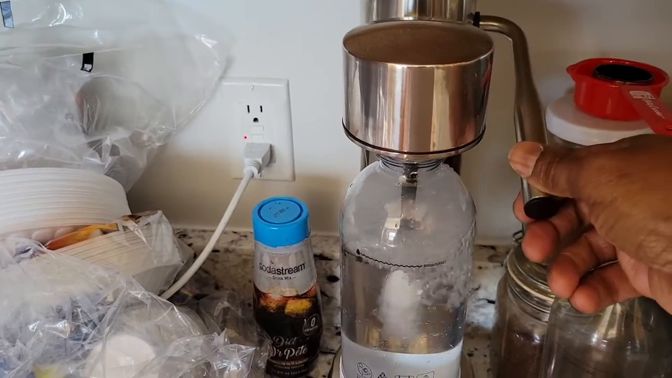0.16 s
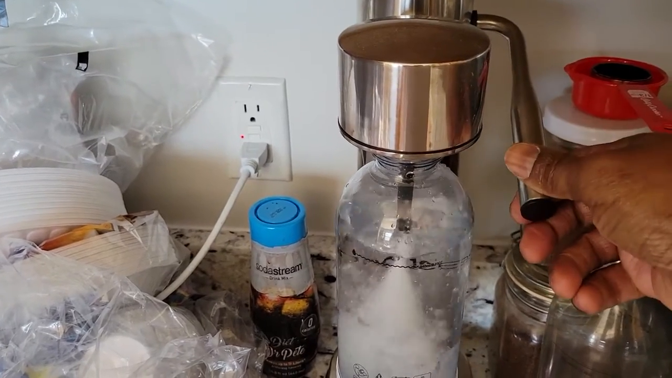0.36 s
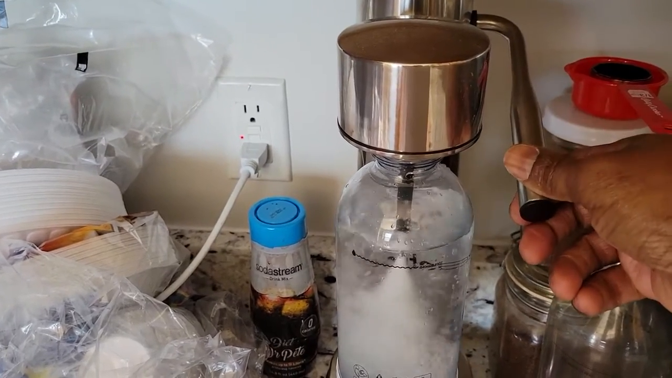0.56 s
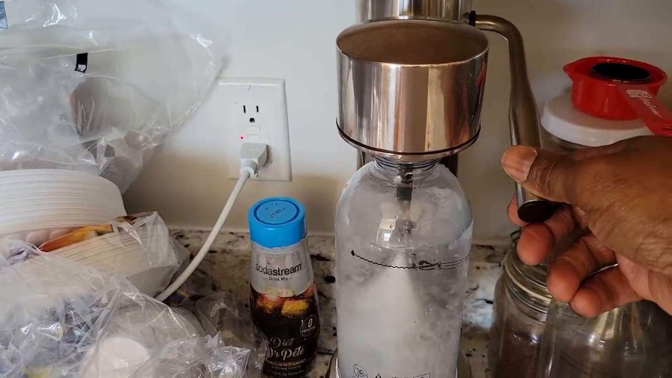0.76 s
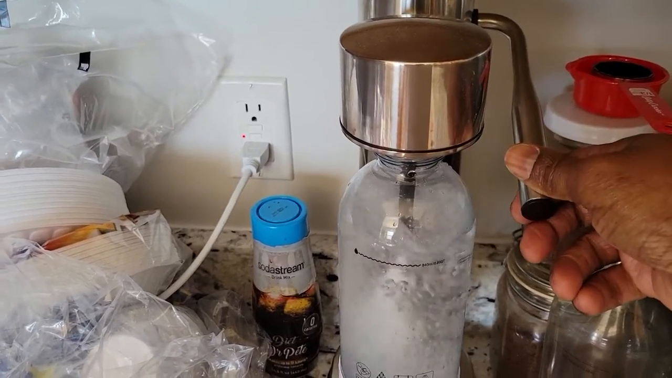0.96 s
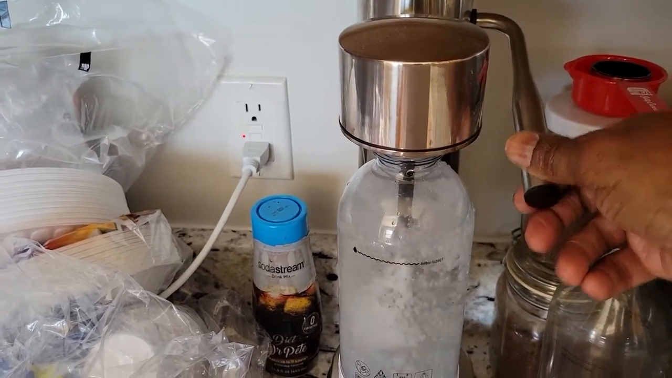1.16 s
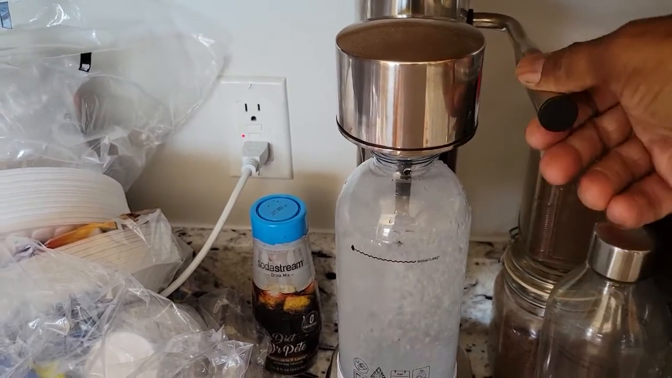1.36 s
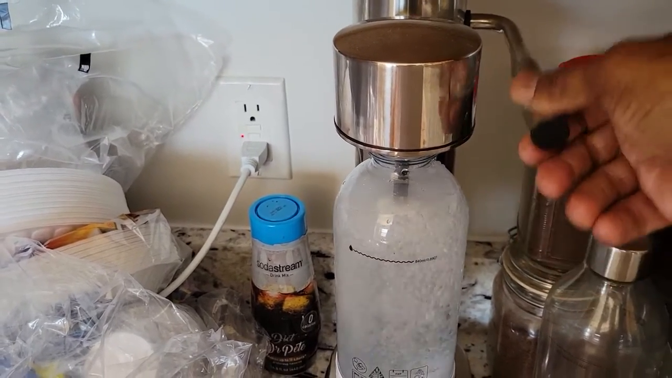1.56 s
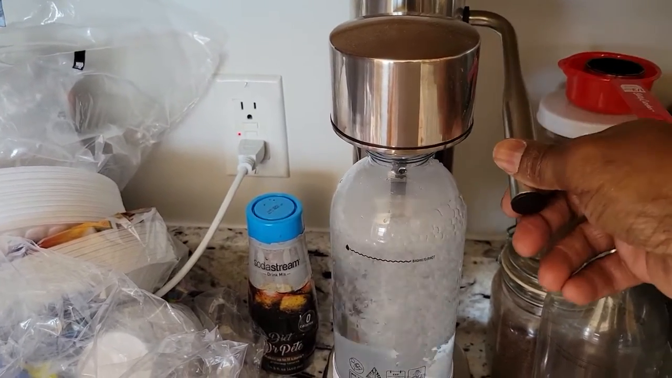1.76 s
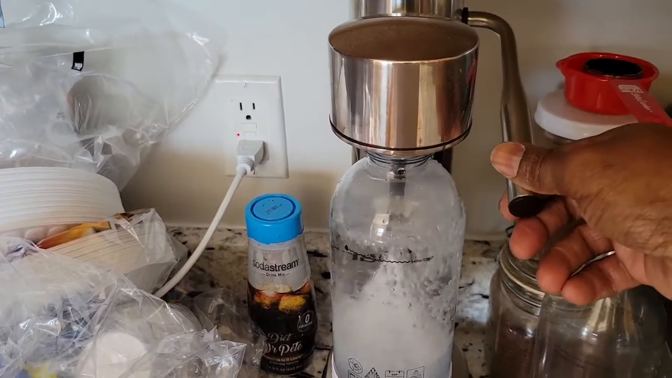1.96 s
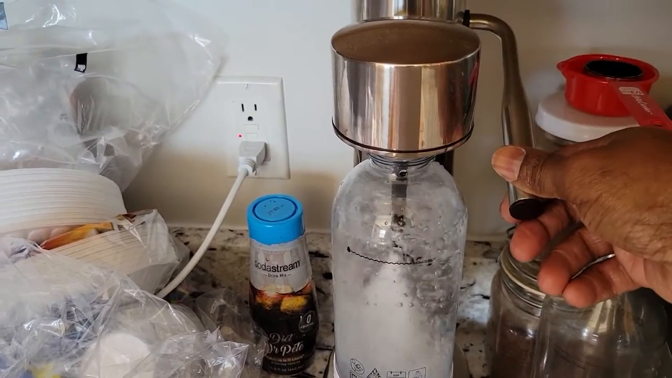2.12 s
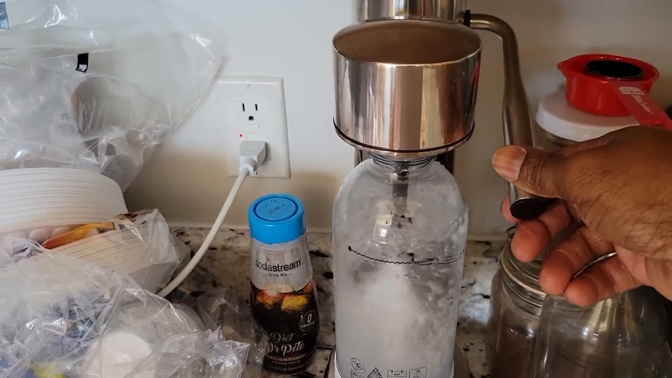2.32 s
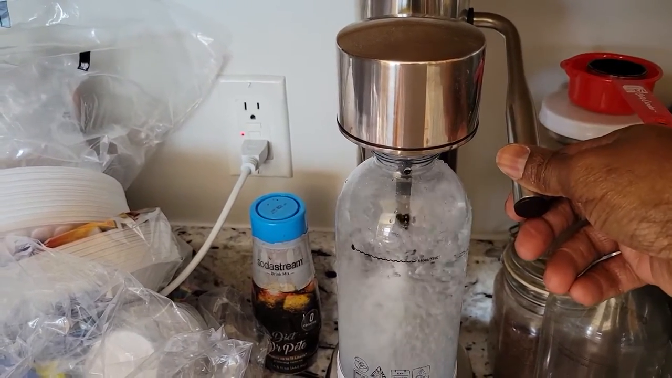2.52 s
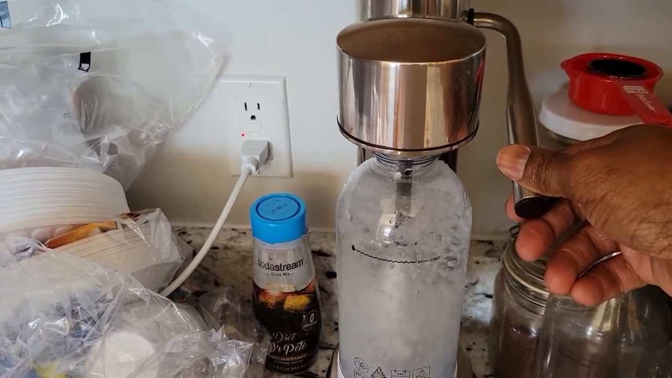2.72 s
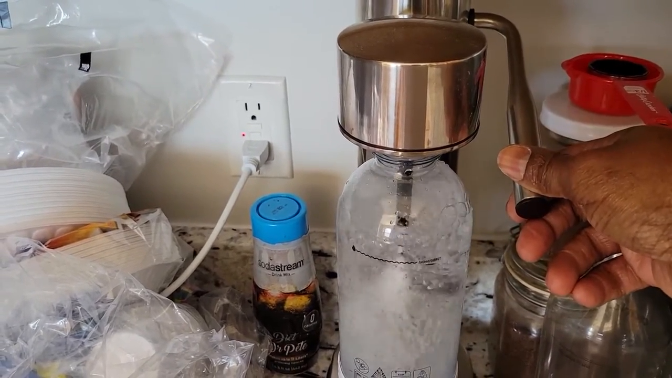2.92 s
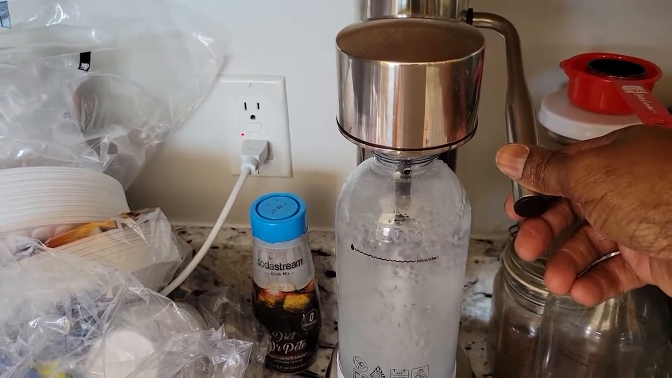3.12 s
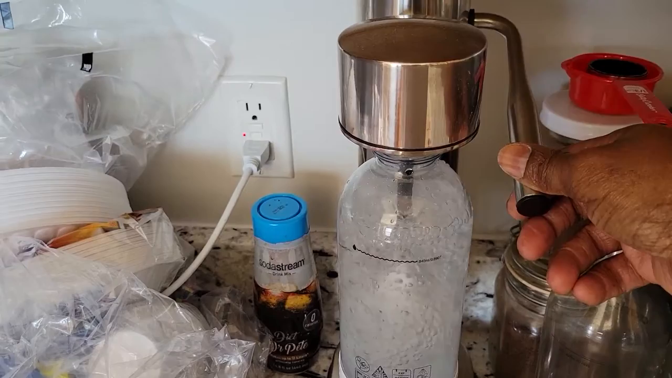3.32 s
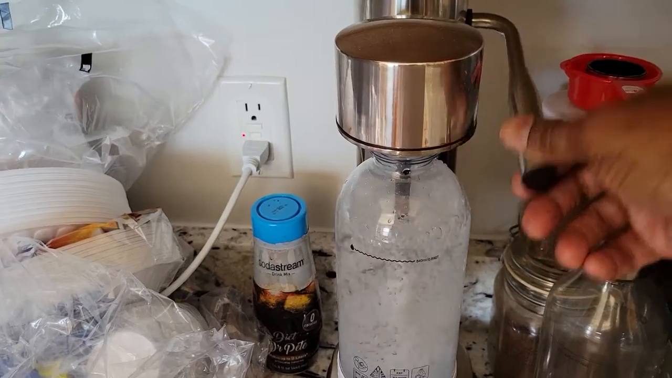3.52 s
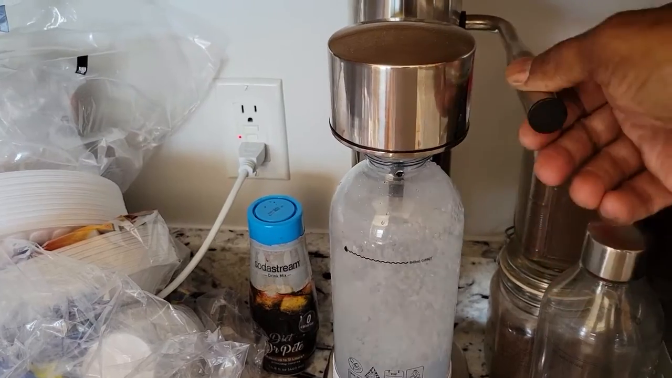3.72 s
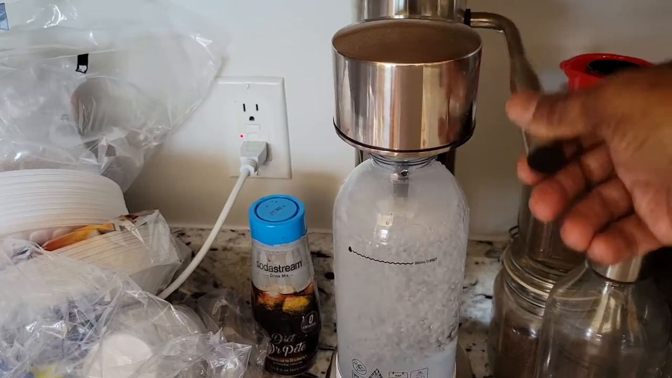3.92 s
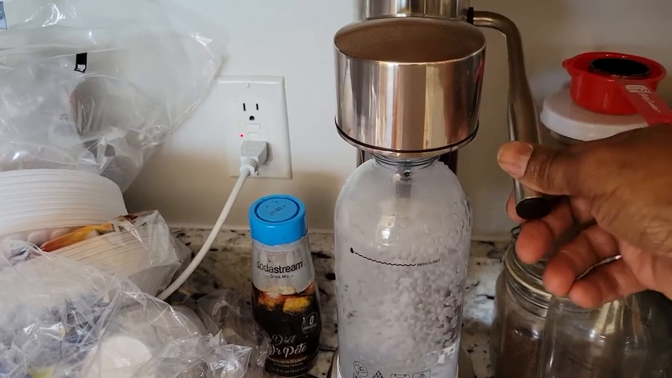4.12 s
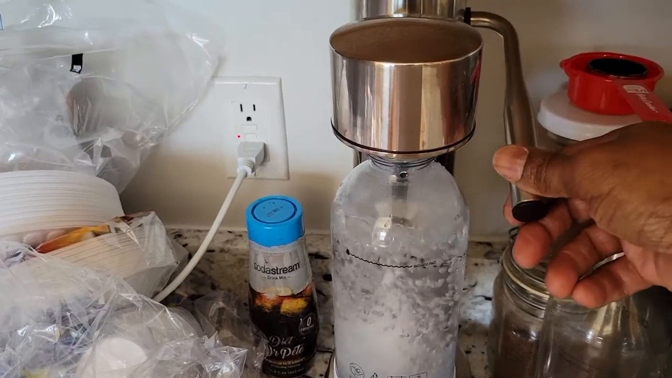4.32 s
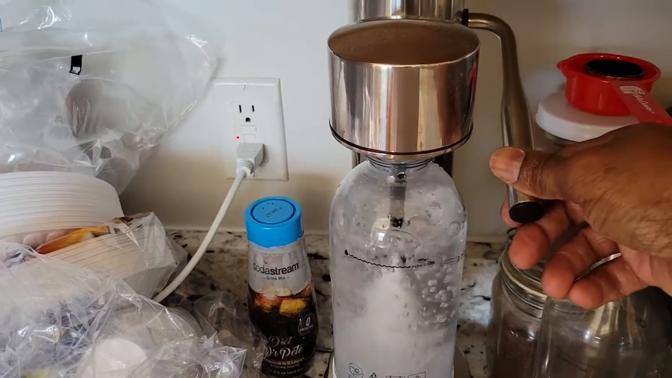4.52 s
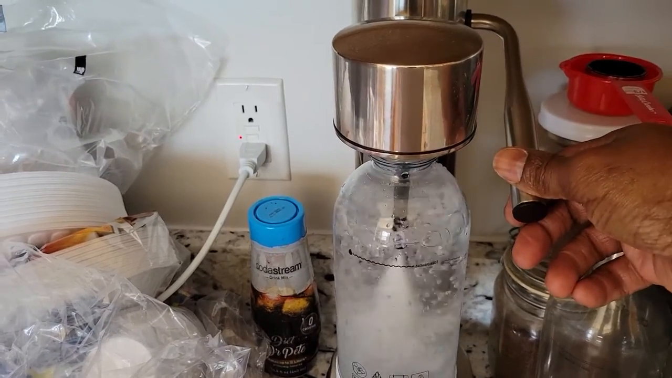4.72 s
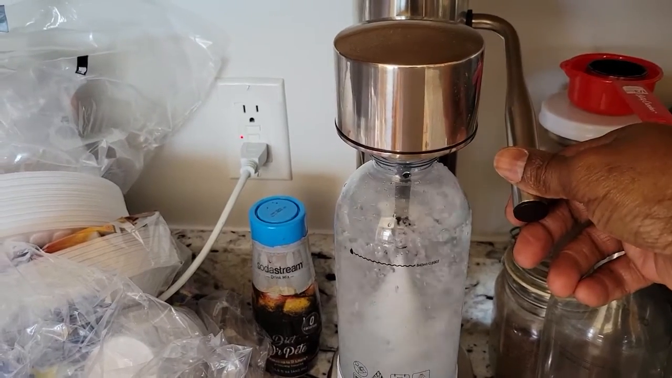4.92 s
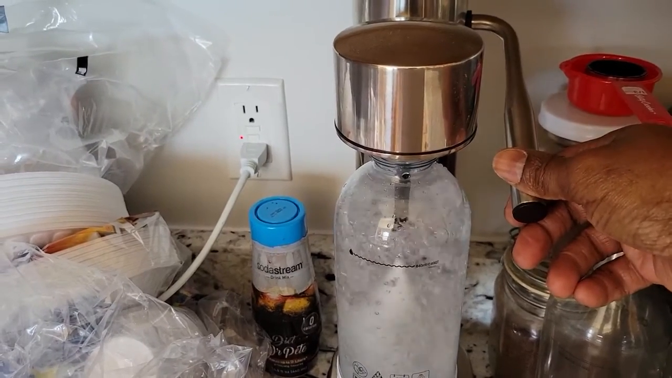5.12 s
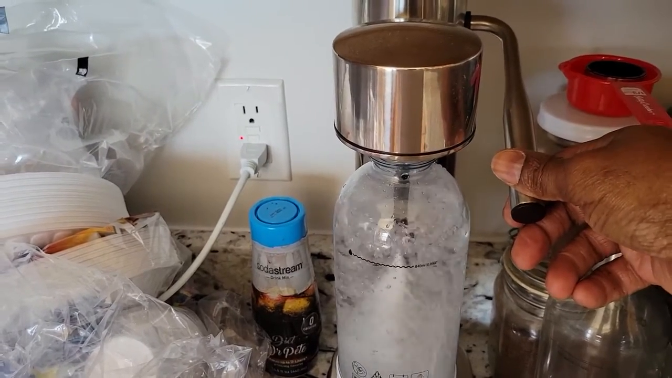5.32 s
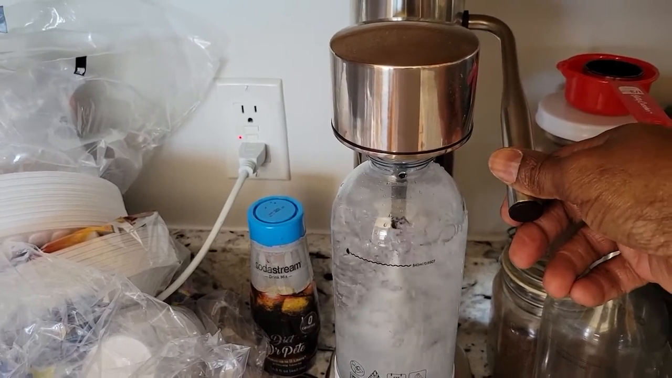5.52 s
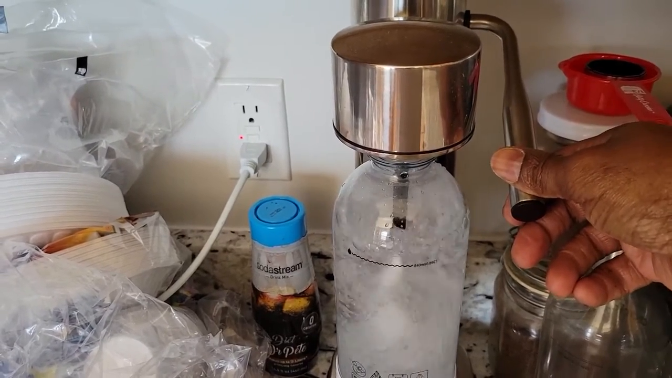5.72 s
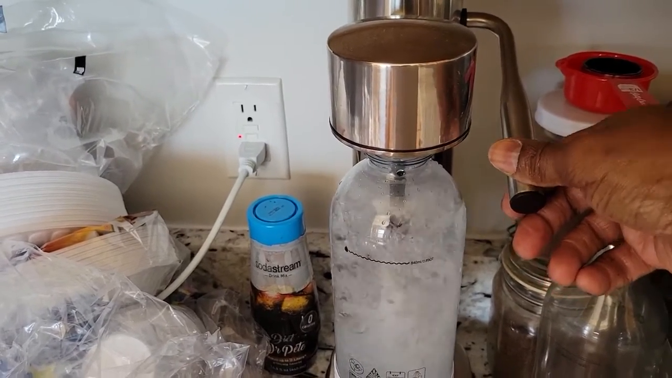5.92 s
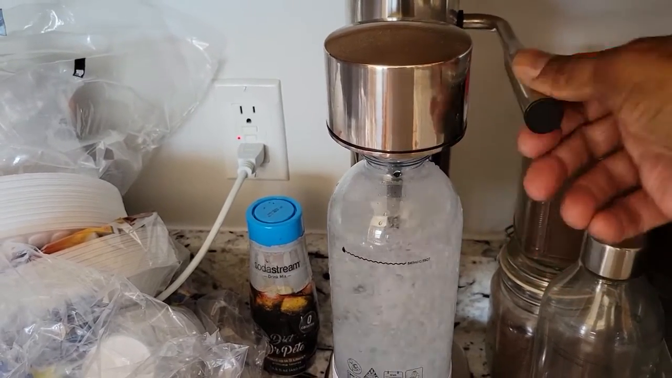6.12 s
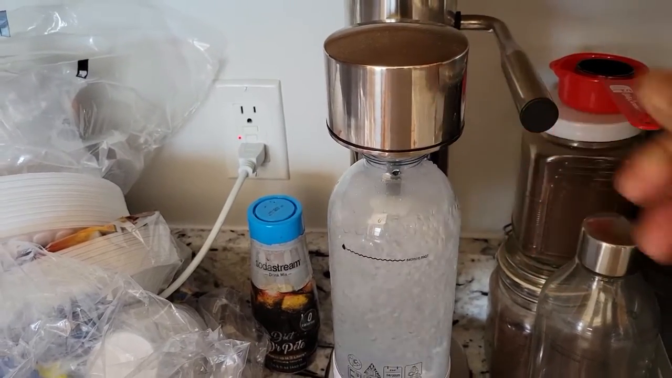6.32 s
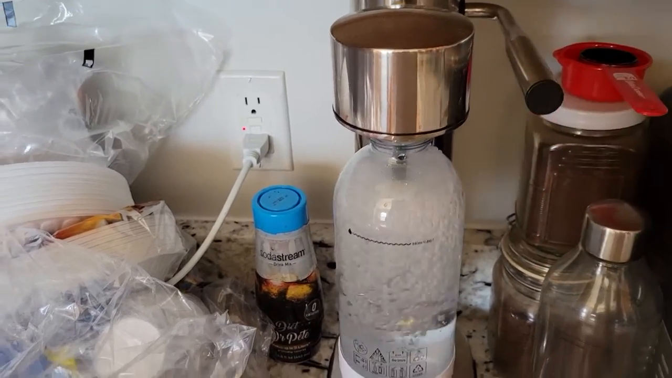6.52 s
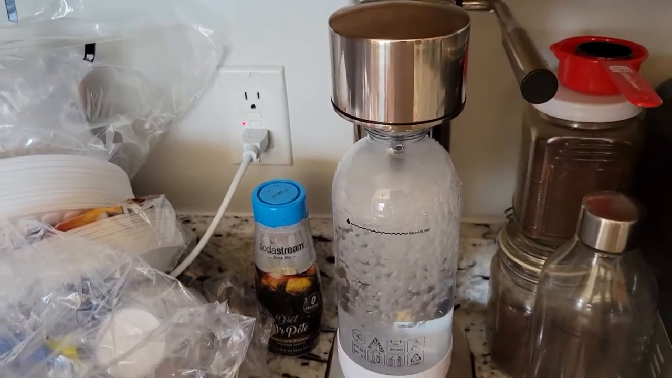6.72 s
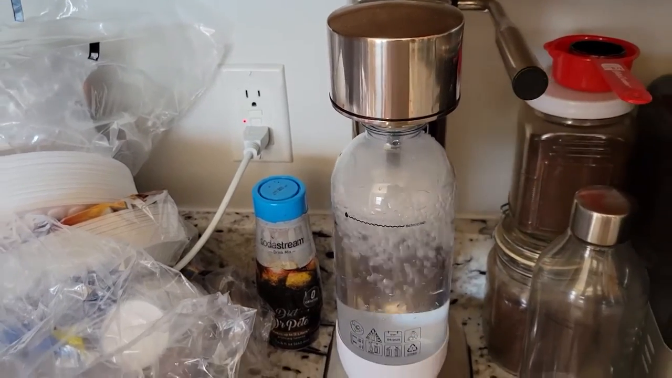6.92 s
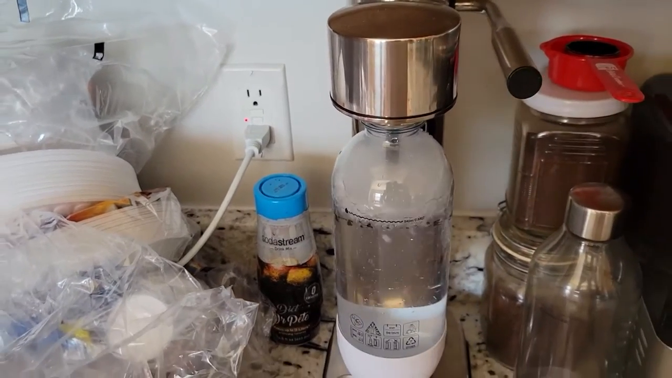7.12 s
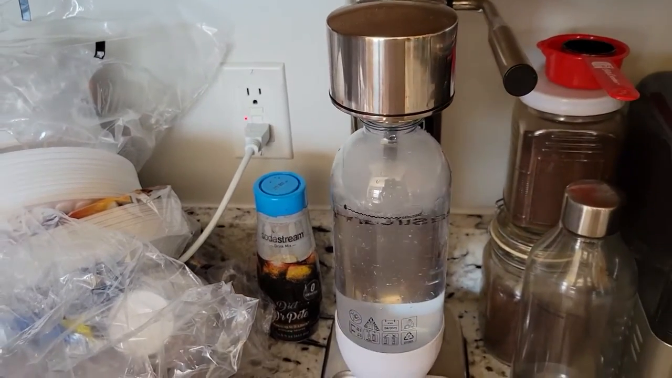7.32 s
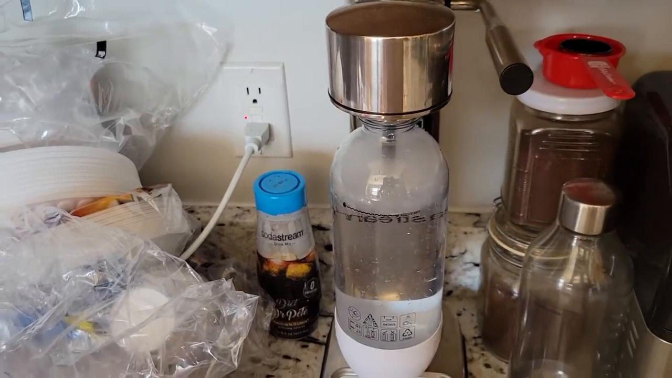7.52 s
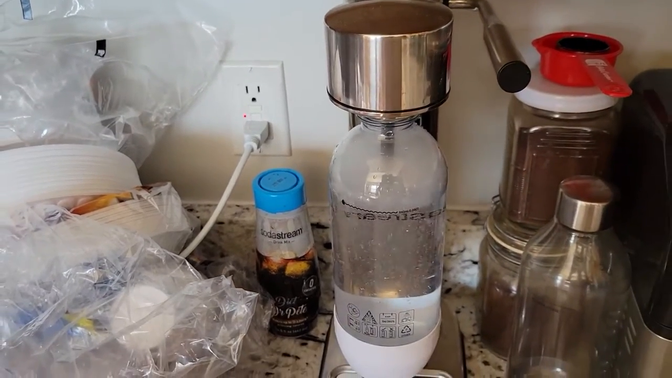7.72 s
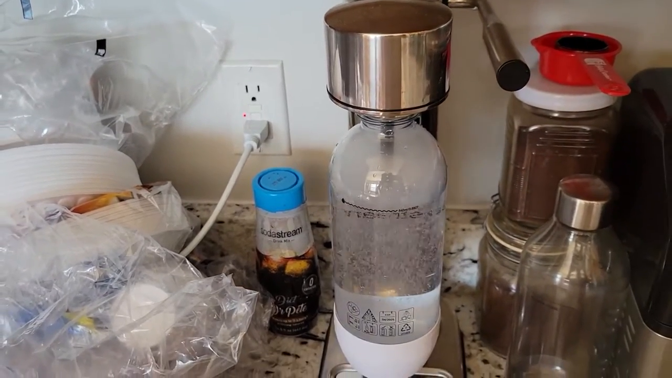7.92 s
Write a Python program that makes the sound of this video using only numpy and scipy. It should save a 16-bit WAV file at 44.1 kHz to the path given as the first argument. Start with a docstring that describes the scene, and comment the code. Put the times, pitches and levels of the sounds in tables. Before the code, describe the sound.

A countertop carbonating machine heard from very near, in stereo: soft lever knocks, then a fizzing, bubbling rush in the bottle, cut off by a sudden spurt of escaping gas. The rush returns twice, growing finer and fizzier as pressure builds. After a hard click-clack, the last release hisses brightly, weakens with a thin whistle and fades, leaving quiet low kitchen rumble and a few light knocks along the way.

```python
"""A cloud of carbon dioxide bubbles roars in a bottle of water while a lever is held, three times.
The roar is banded noise from random bubble births plus gliding tones, rung through the bottle; the gas space hums.
On release the valve vents a bright hiss: smooth noise coloured by a pipe, whistling as the flow weakens.
Lever and valve knock now and then: short rattles ringing the machine head.
Behind it lies a low kitchen rumble of banded noise with wavering hum tones."""
import sys
import numpy as np
from scipy import signal
from scipy.io import wavfile
from scipy.ndimage import uniform_filter1d

SR = 44100
rng = np.random.default_rng(int(sys.argv[2]) if len(sys.argv) > 2 else 0)


def dump_mix(stems):
    """Bounce the given channels to the path in sys.argv[1] as a 16-bit WAV at rate SR."""
    frames = np.atleast_2d(stems).T  # one column per channel
    limited = np.clip(frames, -1, 1)  # hard clip at full scale
    pcm = np.round(limited * 32767).astype(np.int16)
    wavfile.write(sys.argv[1], SR, pcm)


N = 350991

# gas jet, stretch by stretch: (time [s], relative roar level [dB], low, middle, high ring level re roar [dB])
JET_STRETCHES = [
    [(0.13, -39, -14, -14, -10), (0.142, -42, -12, 1, -10), (0.148, -39, -29, 3, -8),
     (0.186, -25.5, -16, -1.5, -20), (0.248, -31.5, -7, -6, -12), (0.258, -29.5, -12, -3.5, -27),
     (0.35, -33, -11, -4, -6), (0.356, -30, -18, -2.5, -29), (0.428, -31, -11, -2, -11),
     (0.478, -23.5, -3.5, -5, -19), (0.56, -28.5, -14, -5, -18), (0.674, -24, -3, -0.5, -14),
     (0.706, -22.5, -7, -2, -11), (0.834, -26.5, -11, -5.5, -16.5), (1.036, -23.5, -5.5, -5.5, -8),
     (1.26, -32, -12, -4, -10.5)],
    [(1.715, -47, -2, 6, -6), (1.729, -27, -5, -8, -16), (1.757, -24, -11, -1, -10),
     (1.801, -21.5, -2, -5, -12), (1.883, -19.5, -6.5, -18, -19), (1.919, -25, -9, 0, -11),
     (1.945, -27, -14, -1.5, -14), (1.999, -23, -7, -9, -14), (2.069, -26, -8, -6, -13),
     (2.097, -28, -9, -1.5, -10), (2.119, -22.5, -11, 0, -12), (2.187, -22, -11, -9, -9.5),
     (2.355, -23, -15, -5, -11), (2.407, -23, -7, -16, -8.5), (2.439, -25, -10, -13, -9.5),
     (2.64, -22, -4, -2, -7.5)],
    [(2.66, -21.5, -7, -14, -12), (2.69, -25, -10, -17, -5), (2.71, -21.5, -5.5, -4, -8),
     (2.8, -24.5, -2.5, -16, -5.5), (2.852, -22, -18, 0.5, -10), (2.86, -22, -14, -6, -9),
     (2.948, -21, -1.5, -7.5, -7.5), (3.04, -24.5, -11.5, -3, -5), (3.09, -26, -12, -18, -7),
     (3.13, -28, -6, -17, -6.5), (3.142, -27, -9, -2, -10), (3.216, -24.5, -12.5, -4, -5),
     (3.382, -22, -3, -11, -4), (3.418, -24.5, -4.5, -7, -5.5), (3.56, -32.5, -8, 0, -7)],
    [(4.045, -46, 0, 2, -8), (4.065, -26, -19, -7, -10), (4.083, -28.5, -10, -11, -4),
     (4.141, -24.5, -6, -17, -1.5), (4.245, -22, -2.5, -5.5, -4.5), (4.431, -27.5, -15, -4, -12),
     (4.513, -25, -26, -9, -4), (4.551, -26.5, -8, -8, -9), (4.603, -22, -30, -7, -10),
     (4.615, -29, -8, -7, -5.5), (4.655, -25.5, -2, 1, -5), (4.667, -17, -11, -16, -6.5),
     (4.681, -26, -4, -7, -5), (4.743, -25.5, -12, -5, -9), (4.8, -27.5, -8, -10, -7)],
    [(4.82, -25, -18, -9, -12), (4.882, -28, -16, -9, -13.5), (4.928, -24.5, -13, -5, -4),
     (4.978, -25.5, -4, -7, -13), (4.986, -25, -7, -13, -6.5), (5.088, -23, -12, -5, -11),
     (5.162, -26.5, -8, -16, -4), (5.19, -20, -7, -6, -7), (5.206, -26, -5, 3, -7),
     (5.226, -25, -23, -2, -4), (5.326, -27, -12, -11, -11), (5.384, -24, -17, -13, -9.5),
     (5.534, -24.5, -10, -5, -10), (5.59, -28, -13, -6, -8)],
    [(5.65, -23, -15, -20, -13), (5.662, -32, -8, -10, -13), (5.68, -29.5, -18, -18, -11),
     (5.698, -30, -7, -19, -15), (5.758, -29, -13, -18, -6), (5.784, -36, -2, -12, -13),
     (5.802, -27, -4, -14, -1), (5.822, -30.5, -7, 6, -4), (5.874, -30, -16, -5, -3),
     (5.884, -23.5, -8, -8, -10), (5.948, -40.5, -15, 2, -5), (5.96, -34, -2, 3, -4),
     (5.972, -32, -4, -2, -7), (5.994, -50, 15, 6, -15), (6.022, -45, 3, 4, -9), (6.03, -40, 15, 15, -6)],
]
# pulls, at start and end: (time [s], bottle pressure [0-1], gas space hum level [dB])
FILLS = [
    [(0.13, 0, -43), (1.28, 0.37, -52)],
    [(1.715, 0, -50), (3.59, 0.78, -51)],
    [(4.045, 0.22, -56), (5.75, 0.88, -48), (6.04, 0.83, -73)],
]
# bubble roar spectrum: (frequency [Hz], relative density [dB per Hz])
ROAR_SPECTRUM = [(260, -73), (450, -34.5), (590, -25), (846, -12), (1540, -8.5), (1790, -9), (2110, -5),
                 (2690, -2.5), (4620, -11), (5610, -11.5), (8170, -20.5), (10900, -30.5), (12100, -25.5),
                 (15300, -39), (16300, -49)]
# roar stereo balance: (frequency [Hz], left minus right [dB])
ROAR_BALANCE = [(60, 0.0), (150, 2), (380, 2), (950, 2.5), (2380, 6.5), (5980, 2.0), (15000, -0.5)]
# machine stereo image, roar and hiss: (frequency [Hz], left-right likeness [0-1])
MACHINE_LIKENESS = [(350, .6), (1000, .2), (1800, .6), (3400, .58), (5000, .18), (7600, .3), (11000, .12)]
# bottle wall resonances: (frequency [Hz], width [Hz], gain [dB])
BOTTLE_MODES = [(1824, 75, 3), (2260, 20, 1), (2723, 230, -7), (3650, 390, -4), (5550, 1070, 1.5)]
# bottle rings that swell with the cloud: (frequency [Hz], width [Hz], swing [x ring level swing], wander [dB])
BOTTLE_RINGS = [(1860, 224, 1.3, 2), (2670, 160, 1.3, 0.5), (3630, 1960, 1.2, 3)]
RING_SWELLS_PER_S = 2.2
GAS_SPACE_HZ, GAS_SPACE_WIDTH_HZ = 373.8, 34
HUM_WAVER_DB, HUM_WAVERS_PER_S = 2, 14
HUM_FOLLOWS = 0.52   # share of the roar's dips that the hum shares
FIZZ_DB_PER_PRESSURE, DEPTH_DB_PER_PRESSURE = 15.5, -10.5   # smaller bubbles under pressure
FIZZ_STEADY, DEPTH_STEADY = 0.77, 1   # shares of the roar's surges that fizz and low end ignore
GLIDE_DB, GLIDE_DB_PER_PRESSURE = -8, -7   # at half pressure; long glides belong to the slack bottle
POP_DB, POP_DB_PER_PRESSURE = -21, 14   # at half pressure; bright pops come with pressure


def jet():
    """Bubbles torn off the nozzle in clumps ring through the bottle wall; the gas space above the water hums."""
    roar_db, *rings_db = in_time(JET_STRETCHES)[1:]
    gate, pressure, hum_db = in_time(FILLS)
    held = gate > .5
    pressure = pressure - .5   # the spectrum holds for half pressure
    surge_db = np.clip(roar_db - roar_db[held].mean(), -12, 12)
    fizz_db = FIZZ_DB_PER_PRESSURE * pressure - FIZZ_STEADY * surge_db
    depth_db = DEPTH_DB_PER_PRESSURE * pressure - DEPTH_STEADY * surge_db
    tilt_db = tilt(fizz_db, depth_db, pivot_hz=3330, reach=0.66)

    births = grains(7000 * amp(1.8 * drift(60)), spread_db=0.5)
    cloud = bands(births, ROAR_SPECTRUM, MACHINE_LIKENESS, ROAR_BALANCE, tilt_db,
                  patchy_db=2.03, patch_rate=13.2, per_octave=5)
    short_glides = gurgles(held, tilt_db, 799.8, 4998, per_s=1100, length_s=0.0336,
                           rise=0.167, rough_hz=66, size=1500)
    long_glides = gurgles(held, tilt_db, 1550, 3000, per_s=60, length_s=0.1,
                          rise=0.3, rough_hz=90, size=4000)
    pops = gurgles(held, tilt_db, 4200, 6600, per_s=25, length_s=0.04,
                   rise=0.04, rough_hz=40, size=1500)
    cloud = cloud + amp(-6.0) * short_glides
    cloud = cloud + amp(GLIDE_DB + GLIDE_DB_PER_PRESSURE * pressure) * long_glides
    cloud = cloud + amp(POP_DB + POP_DB_PER_PRESSURE * pressure) * pops

    cloud = coloured(cloud, BOTTLE_MODES)
    swells = 0
    for (hz, width_hz, swing, wander_db), ring_db in zip(BOTTLE_RINGS, rings_db):
        swell_db = swing * (ring_db - ring_db[held].mean()) + wander_db * drift(RING_SWELLS_PER_S)
        swells = swells + (amp(swell_db) - 1) * resonate(cloud, hz, width_hz)
    cloud = cloud + swells
    # levelled, so that the table alone sets the slow level
    loudness = np.sqrt(uniform_filter1d((cloud ** 2).mean(axis=0), size=SR // 12) + 1e-6)
    roar = amp(roar_db + 3.0) * cloud / loudness

    hum_db = hum_db + HUM_FOLLOWS * surge_db.clip(-12, 0) + HUM_WAVER_DB * drift(HUM_WAVERS_PER_S)
    return gate * (roar + amp(hum_db) * gas_space())


def gas_space():
    """Noise through the gas resonance: a rough tone, levelled to be without long swells."""
    mid, side = rng.standard_normal((2, N))
    for _ in range(2):   # twice, for a clear pitch
        mid, side = resonate(np.array([mid, side]), GAS_SPACE_HZ, GAS_SPACE_WIDTH_HZ)
    hum = stereo(mid, side, 0.76, balance_db=-2.5)
    return hum / np.sqrt(uniform_filter1d((hum ** 2).mean(axis=0), size=SR // 5) + 1e-12)


def gurgles(held, tilt_db, low_hz, high_hz, per_s, length_s, rise, rough_hz, size):
    """Bubbles ring as rough tones that glide upward; loudness by pitch follows the roar."""
    draws = rng.random((int(per_s * N / SR), 5))
    starts = (draws[:, 0] * (N - size)).astype(int)
    at, pitch, strength, pan, lot = draws[held[starts]].T
    at = (at * (N - size)).astype(int)
    hz = low_hz * (high_hz / low_hz) ** pitch
    t = np.arange(size) / SR
    age = t / length_s * np.sqrt(hz / 2500)[:, None]   # small bubbles die sooner
    flutter_at = (lot * (N - size)).astype(int)[:, None] + np.arange(size)
    flutter = .4 + drift(rough_hz)[flutter_at]
    glide = 1 + rise * lot[:, None] * age / 2
    tones = np.sin(2 * np.pi * hz[:, None] * t * glide) * age * np.exp(-5.0 * age) * flutter
    level_db = at_hz(ROAR_SPECTRUM, hz) + tilt_db(hz, at) + 2.1 * drift(19)[at] + 3.2 * strength
    gain = np.sqrt(hz) * amp(level_db)
    side_db = at_hz(ROAR_BALANCE, hz) / 2 + 14 * (pan - .5)
    where = (at[:, None] + np.arange(size)).ravel()
    sides = []
    for sign in (1, -1):
        weighted = tones * (gain * amp(sign * side_db))[:, None]
        sides.append(np.bincount(where, weighted.ravel(), N))
    return rms_one(np.array(sides))


def grains(per_s, spread_db):
    """Bubble births: random clicks of uneven size, at the same moments on both sides; two draws, rms 1."""
    born = rng.random((2, 1, N)) < per_s / SR
    sizes = amp(spread_db * np.minimum(rng.exponential(1, (2, 1, N)), 4))
    return rms_one(born * sizes * rng.standard_normal((2, 2, N)) + 1e-9)


# hiss spectrum: (frequency [Hz], relative density [dB per Hz])
HISS_SPECTRUM = [(290, -38.5), (500, -34.5), (667, -38.5), (956, -23), (1730, -14.5), (2300, -6.5),
                 (2660, -7.5), (2900, -4), (3500, 2.5), (3920, -5.5), (4340, -1), (7840, -3.5),
                 (10300, -12), (15000, -0.5), (15500, 22), (16400, -6)]
# hiss stereo balance: (frequency [Hz], left minus right [dB])
HISS_BALANCE = [(60, 2.0), (150, 2.0), (380, 1.5), (950, 1.7), (2380, 3.9), (5980, 0.64), (15000, 0.33)]
# vent pipe resonances: (frequency [Hz], width [Hz], gain at full flow [dB], gain added as flow dwindles [dB])
PIPE_MODES = [(2430, 46, 8, -10), (2550, 480, -9, -15), (2910, 85, 4.5, -3), (3150, 110, 0.5, -7),
              (3910, 85, -2.5, 10), (7570, 87, -10, 6), (11360, 110, -10, 17)]
# whistles of a weak flow: (frequency [Hz], width [Hz], gain at a trickle [dB])
WHISTLES = [(3950, 300, 6), (4750, 560, 6.5), (6100, 1200, 7), (8490, 300, 8), (9900, 2200, 8)]
DWINDLED_AT_DB = 12   # loss of flow at which the pipe's change is complete


def vent():
    """Gas escapes through the valve as smooth noise, coloured by the vent pipe; a dwindling flow whistles."""
    hiss_db, bright_db, deep_db, drained_db = valve()
    tilt_db = tilt(bright_db, deep_db, pivot_hz=6940, reach=0.86)
    noise = bands(rng.standard_normal((2, 2, N)), HISS_SPECTRUM, MACHINE_LIKENESS, HISS_BALANCE, tilt_db,
                  patchy_db=0.91, patch_rate=22.0)
    weak = np.clip((drained_db - 6.0) / 36, 0, 1)   # 0 full flow, 1 a trickle
    whistles = 0
    for hz, width_hz, db in WHISTLES:
        tone = resonate(resonate(noise, hz, width_hz), hz, width_hz)
        whistles = whistles + amp(db + 2.8 * drift(11)) * tone
    dwindled = np.clip(drained_db / DWINDLED_AT_DB, 0, 1)
    pipe = 0
    for hz, width_hz, db, gained_db in PIPE_MODES:
        pipe = pipe + amp(db + gained_db * dwindled) * resonate(noise, hz, width_hz)
    return amp(hiss_db) * (noise + pipe + weak * whistles)


# valve releases; the fourth is a slight seep after a knock:
# (opens [s], shuts [s], opening time [s], hiss level [dB], top octave swing [dB], low end swing [dB])
RELEASES = [(-.3, 0.0027, .011, -20.5, -3, 18), (1.248, 1.647, 0.014, -16, 0.5, 10),
            (3.566, 3.99, 0.0079, -12.5, -1, 11), (5.61, 6.4, 0.0044, -28, -11, 13),
            (6.034, 9, 0.0065, -12.5, -1, 10)]
OPENING_DB, SWELL_DB, SWELL_SLOWER = 35, 4.5, 5.1   # flow leaps up, then swells, this many times slower
SPIT_DB, SPIT_S = 2, 0.024   # extra treble just after opening
DRAIN_DB_PER_S, DRAIN_DB_PER_S2 = 6, 4   # the bottle empties ever faster
DULL_AFTER_DB, DULL_SHARE, DULL_MOST_DB = 15.5, 1, 9   # a weak flow loses treble
THIN_SHARE = 0.42   # and some low end
CLOSING_DB, CLOSING_S = 21.5, 0.025   # the valve shuts ever faster
TAIL_DB_PER_S, TAIL_DULLS_DB_PER_S = 162, 95   # then the hiss dies away


def valve():
    """Flow of the latest release, per sample: hiss level, treble and low end swing, drained loss (all dB)."""
    t = np.arange(N) / SR
    table = np.array(RELEASES)
    latest = np.searchsorted(table[:, 0], t) - 1
    opens, shuts, opening_s, full_db, top_db, low_db = table[latest].T
    age, late = t - opens, t - shuts
    drained_db = DRAIN_DB_PER_S * age + DRAIN_DB_PER_S2 * age ** 2
    closing_db = CLOSING_DB * np.exp(np.minimum(late, 0) / CLOSING_S)
    lost_db = drained_db + closing_db + TAIL_DB_PER_S * late.clip(0)
    leap_db = OPENING_DB * np.exp(-age / opening_s)
    swell_db = SWELL_DB * np.exp(-age / opening_s / SWELL_SLOWER)
    hiss_db = full_db - lost_db - leap_db - swell_db
    dulled_db = np.clip(DULL_SHARE * (drained_db - DULL_AFTER_DB), 0, DULL_MOST_DB)
    tail_dulled_db = TAIL_DULLS_DB_PER_S * late.clip(0, .1)
    bright_db = top_db + SPIT_DB * np.exp(-age / SPIT_S) - dulled_db - tail_dulled_db
    deep_db = low_db - THIN_SHARE * drained_db.clip(0, 40)
    return hiss_db, bright_db, deep_db, drained_db


# knocks and short clicks; the row at 5.605 s is a soft bright tick just before the loudest knock: (time [s],
# relative contact peak [dB], contact colour [Hz], time to fall 30 dB [s])
KNOCKS = [(0.045, -42, 530, 0.043), (0.05, -38, 1600, 0.036), (0.138, -41, 1250, 0.0094),
          (1.683, -42.5, 583, 0.032), (1.677, -38.5, 1670, 0.057), (4.009, -44, 930, 0.036),
          (4.034, -45.5, 587, 0.016), (5.605, -12, 5500, 0.012), (5.6091, -3.5, 2440, 0.0093),
          (5.6093, -21, 990, 0.05), (5.611, -30, 610, 0.047), (5.6114, -2, 5560, 0.038),
          (5.6142, -10, 3200, 0.026), (5.621, -13, 3300, 0.022), (5.622, -21, 4500, 0.05),
          (5.63, -32, 119, 0.049), (5.652, -30, 3500, 0.012), (5.685, -29, 5500, 0.0073),
          (6.004, -42.5, 513, 0.22), (6.25, -35.5, 320, 0.034), (6.495, -26.5, 970, 0.04),
          (6.568, -44, 297, 0.012)]
# machine head modes: (frequency [Hz], relative gain [dB], t60 [s])
HEAD_MODES = [(130, -12, 0.1), (356, 0, 0.022), (548, 5, 0.025), (773, 3, 0.02), (890, 5, 0.04),
              (988, 4, 0.018), (1210, 3, 0.015), (1780, 7, 0.018), (3180, 10, 0.018), (4300, 0, 0.006),
              (5700, 7, 0.006), (6500, 2, 0.006), (8050, -5, 0.006)]


def knocks():
    """Each knock is a short dying rattle, coloured by its contact, into the modes of the machine head."""
    force = np.zeros((2, N))
    for s, peak_db, contact_hz, length_s in KNOCKS:
        t = np.arange(4000) / SR
        rattle = rng.standard_normal((2, len(t))) * amp(-30 * t / length_s)
        rattle[:, 0] += 7.0   # first contact
        width_hz = contact_hz * np.clip((contact_hz / 1400) ** 2, .4, 1.7)   # hard contacts are broad
        contact = resonate(resonate(rattle, contact_hz, width_hz), contact_hz, 2 * width_hz)
        start = round(s * SR)
        force[:, start:][:, :len(t)] += amp(peak_db) * contact / np.abs(contact).max()
    out = 0.53 * force
    for hz, db, t60_s in HEAD_MODES:
        width_hz = np.log(1000) / np.pi / t60_s
        out = out + amp(db - 2.0) * resonate(force + 1e-18, hz, width_hz)
    return stereo(out[0], out[1], 0.12, balance_db=0.5)


# rumble spectrum: (frequency [Hz], relative density [dB per Hz])
RUMBLE_SPECTRUM = [(15, -30), (25, -4), (86, 1), (141, -16), (249, -12), (293, -5), (386, -31), (638, -19),
                   (897, -18), (1110, -16), (1200, -24), (1560, -57), (2640, -120)]
# wavering hum: (frequency [Hz], width [Hz], level [dB] at the mean of the handling swing)
ROOM_HUM = [(51.7, 8.4, -52), (87, 9.8, -62), (130.6, 20, -55.5), (219.2, 10, -58), (246.5, 2.7, -60)]
# room stereo image: (frequency [Hz], left-right likeness [0-1])
ROOM_LIKENESS = [(40, .92), (90, .78), (180, .78), (350, .55), (2000, .1)]
RUMBLE_DB = -63
HANDLING_DB, HAND_ON_S, HAND_OFF_S = 5.5, 0.037, 6.4   # louder over the span of lever work


def room():
    """Low rumble of the kitchen as patchy noise, with narrow noise bands as wavering hum tones."""
    t = np.arange(N) / SR
    handled = (t > HAND_ON_S) * (t < HAND_OFF_S) * 1.
    level_db = RUMBLE_DB + HANDLING_DB * uniform_filter1d(handled, size=SR // 6)
    rumble = bands(rng.standard_normal((2, 2, N)), RUMBLE_SPECTRUM, ROOM_LIKENESS, [(1, 0), (2, 0)],
                   lambda hz, at: 0, patchy_db=4.5, patch_rate=4.6, per_octave=2.2)
    out = rumble * amp(level_db)
    for hz, width_hz, db in ROOM_HUM:
        mid, side = resonate(rng.standard_normal((2, N)), hz, width_hz)
        tone = rms_one(stereo(mid, side, at_hz(ROOM_LIKENESS, hz)))
        out = out + amp(db + level_db - level_db.mean()) * tone
    return out


def amp(db):
    """Gain of a dB value."""
    return np.exp(np.log(10) / 20 * np.asarray(db))


def rms_one(x):
    """Scaled to rms 1."""
    return x / np.sqrt(np.mean(x ** 2) + 1e-20)


def in_time(tables):
    """A gate that is open inside the tables, then their columns per sample."""
    t = np.arange(N) / SR
    s, *columns = np.concatenate(tables).T
    inside = sum((t >= rows[0][0]) & (t <= rows[-1][0]) for rows in tables)
    gate = uniform_filter1d(inside * 1., size=300).clip(0, 1)
    return [gate] + [np.interp(t, s, c) for c in columns]


def at_hz(points, hz):
    """A spectrum read on a log frequency axis."""
    table = np.array(points)
    return np.interp(np.log(hz), np.log(table[:, 0]), table[:, 1])


def resonate(x, hz, width_hz):
    """A two-pole resonance with gain about 1 on top."""
    r = np.exp(-np.pi * width_hz / SR)
    zeros = [(1 - r * r) / 2, 0, (r * r - 1) / 2]
    poles = [1, -2 * r * np.cos(2 * np.pi * hz / SR), r * r]
    return signal.lfilter(zeros, poles, x)


def coloured(x, modes):
    """The sound plus its ringing in a set of resonances."""
    return x + sum(amp(db) * resonate(x, hz, width_hz) for hz, width_hz, db in modes)


def stereo(mid, side, alike, balance_db=0):
    """Left and right from a shared and an unshared part."""
    alike = np.clip(alike, 0, 1)
    shared, own = np.sqrt(1 + alike), np.sqrt(1 - alike)
    mix = np.array([[shared, own], [shared, -own]]) * amp([[balance_db / 2], [-balance_db / 2]])
    return mix @ np.array([mid, side])


def tilt(bright_db, deep_db, pivot_hz, reach):
    """A rule for the level change at a pitch: the ends of the spectrum swing about its middle."""
    def tilt_db(hz, at):
        """Level change at a pitch and sample index; reach in octaves."""
        high = np.log2(hz / pivot_hz) / reach
        low = np.log2(2200 / hz) / 1.52
        return bright_db[at] * np.clip(high, 0, 1.15) + deep_db[at] * np.clip(low, 0, 1)
    return tilt_db


STEP = 40   # samples between values of a slow control


def bands(white, spectrum, likeness, balance, tilt_db, patchy_db, patch_rate, per_octave=4):
    """A filter bank: each band has its level, stereo image and patches shared with its neighbours."""
    low, top = spectrum[0][0], min(spectrum[-1][0], 16500)
    edges = np.geomspace(low, top, int(per_octave * np.log2(top / low)) + 1)
    steps = np.arange(0, N + 1, STEP).clip(0, N - 1)
    out, power = np.zeros((2, N)), 0
    patches = chance(patch_rate)
    for k, (a, b) in enumerate(zip(edges, edges[1:])):
        band = signal.butter(2, [a, b], "band", fs=SR, output="sos")
        mid, side = signal.sosfilt(band, white[k % 2])
        hz = np.sqrt(a * b)
        patches = 0.54 * patches + 1.03 * chance(patch_rate)
        gain = per_sample(amp(at_hz(spectrum, hz) + tilt_db(hz, steps) + patchy_db * patches))
        out += gain * stereo(mid, side, at_hz(likeness, hz), at_hz(balance, hz))
        power += amp(at_hz(spectrum, hz)) ** 2 * (b - a)
    return out / np.sqrt(power * 4 / SR)


def chance(rate):
    """Slow chance of spread 1, one value per step."""
    r = np.exp(-2 * np.pi * STEP * rate / SR)
    smooth = signal.lfilter([1], [1, -2 * r, r * r], rng.standard_normal(N // STEP + 2001))
    return rms_one(smooth[2000:])   # filter settled


def per_sample(slow):
    """Values per step joined by straight lines."""
    return np.interp(np.arange(N) / STEP, np.arange(len(slow)), slow)


def drift(rate):
    """Slow chance of spread 1, per sample."""
    return per_sample(chance(rate))


LEFT_LAG_SAMPLES = 3


def scene():
    """All sources; the machine is nearer the right, so the left hears it a little later."""
    left, right = jet() + vent() + knocks()
    return np.array([np.roll(left, LEFT_LAG_SAMPLES), right]) + room()


# spectral dips: (frequency [Hz], width [Hz], share removed [0-1])
DIPS = [(1089, 125, 0.56), (1518, 39, 0.85)]
CUTOFF_HZ = 15680


def record(dry):
    """Two dips, probably from reflections off the counter; peaks are rounded and the top is cut steeply."""
    for hz, width_hz, share in DIPS:
        dry = dry - np.clip(share, 0, 1) * resonate(dry, hz, width_hz)
    rounded = .85 * np.tanh(dry / .85)
    steep = signal.ellip(12, .5, 80, CUTOFF_HZ, fs=SR, output="sos")
    return signal.sosfilt(steep, rounded)


dry = scene()
out = record(dry)
dump_mix(out)
```